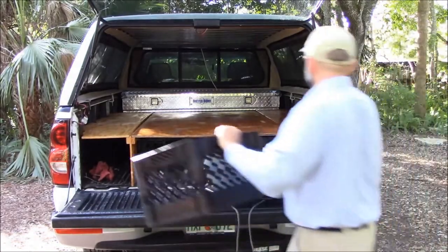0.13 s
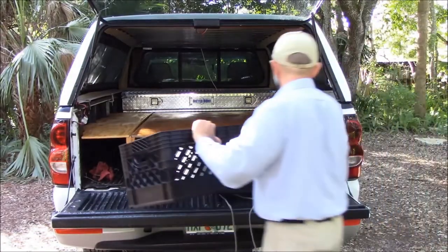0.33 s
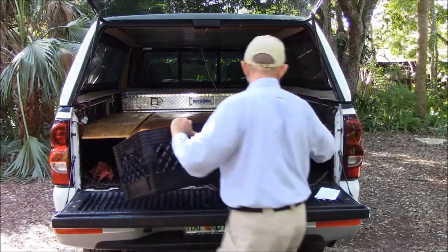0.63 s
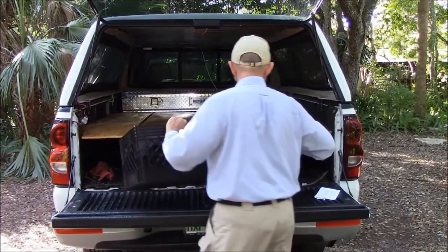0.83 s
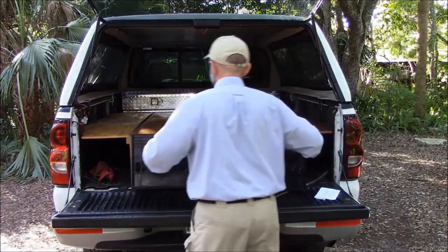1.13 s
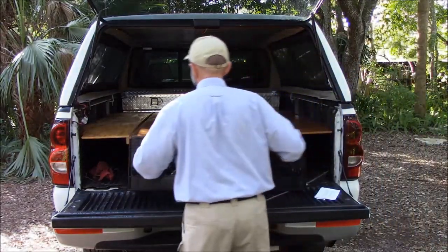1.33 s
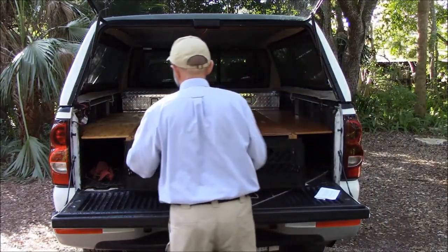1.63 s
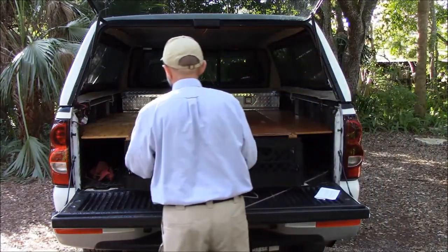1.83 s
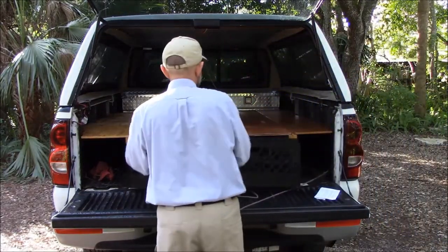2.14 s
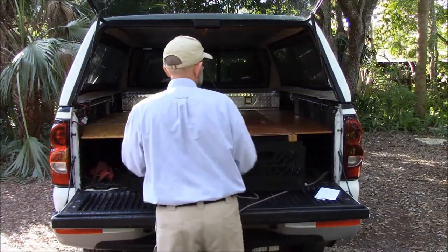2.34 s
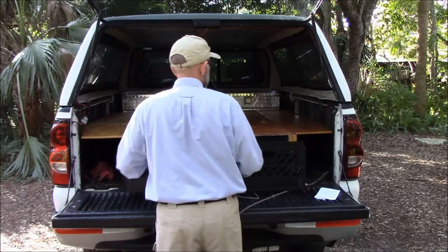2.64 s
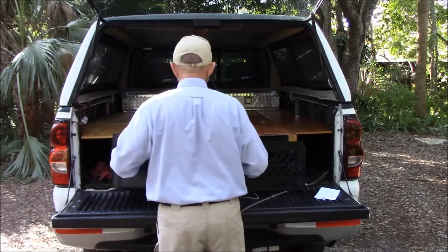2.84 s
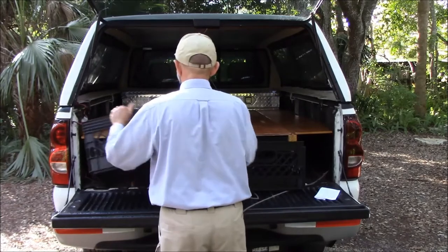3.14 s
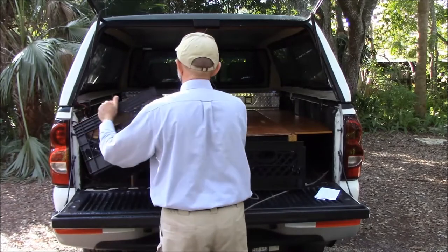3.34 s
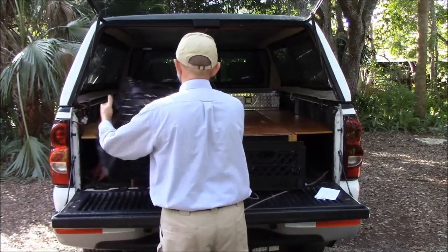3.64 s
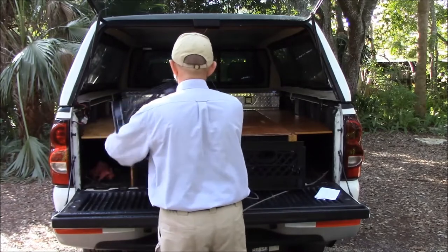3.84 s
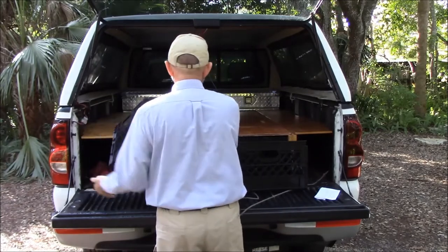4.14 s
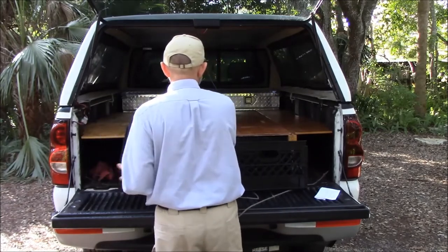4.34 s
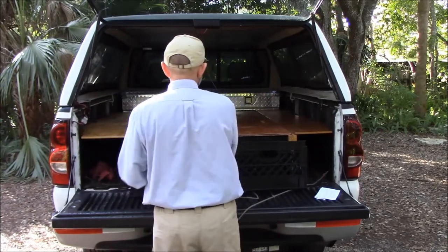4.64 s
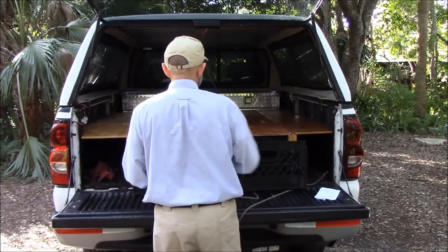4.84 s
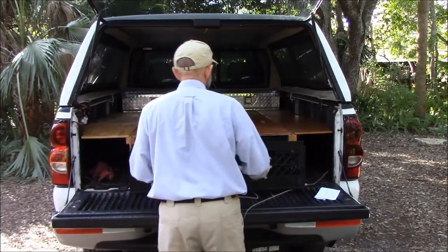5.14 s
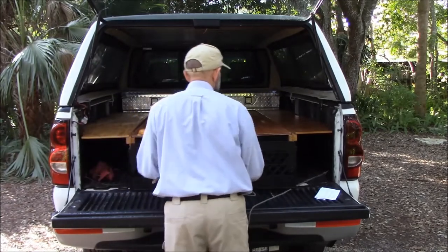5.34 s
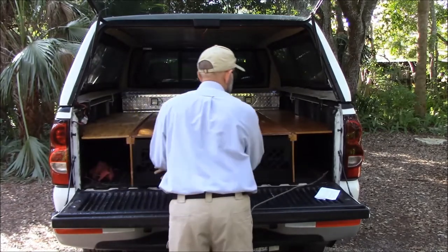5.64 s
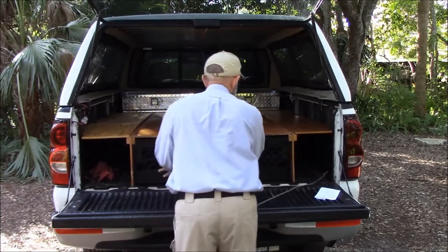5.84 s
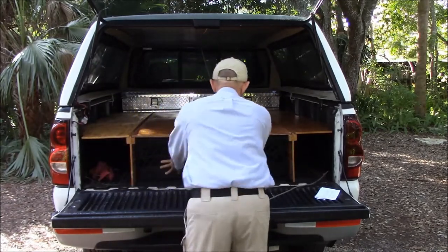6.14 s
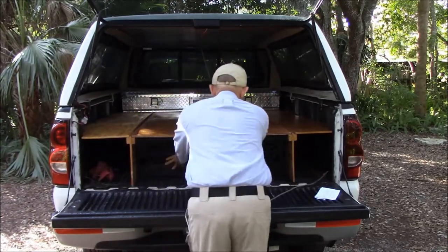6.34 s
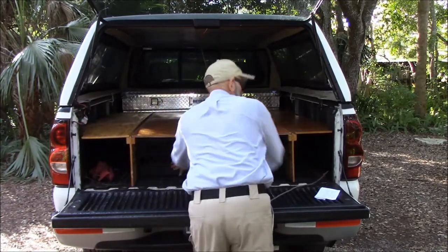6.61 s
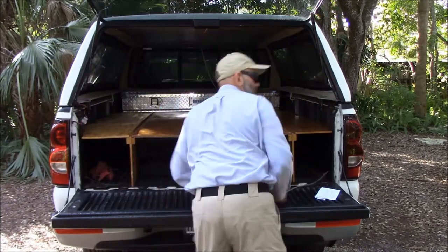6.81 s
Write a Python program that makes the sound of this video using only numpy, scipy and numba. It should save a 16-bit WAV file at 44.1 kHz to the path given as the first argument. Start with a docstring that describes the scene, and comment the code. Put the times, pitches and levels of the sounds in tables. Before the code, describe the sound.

Quiet outdoor air with a soft low rumble. A faint sleeve rustle and tiny dry ticks open, then from 0.25 s an empty plastic crate bumps onto a ribbed truck tailgate: a few moderate hollow knocks until 0.8 s, weaker taps and short gritty scrapes to about 1.45 s, where a duller thump lands. A brief lull follows. From 2.0 to 2.95 s, loud hollow thuds and bright plastic cracks tumble close together with stuttering shoves. Around 3 to 3.9 s there are only small ticks and a cloth brush. At 3.97 s a hard, bright, rapid clatter breaks out, with more knocks and a rough shove at 4.4 to 4.9 s. The strongest bangs hit at 5.2 to 5.3 s, over a long juddering slide under plywood, with further knocks to 5.9 s. The slide fades into light rasp and hiss; a faint wavering high squeak and tiny ticks end it by 6.7 s.

```python
"""A sleeve rustles and small dry ticks sound, then empty plastic crates are knocked about on a tailgate.
Each blow booms in the hollow bed, rings the crate's walls and cracks its ribs, as decaying modes and noise.
Between the blows short shoves scrape by stick-slip; later a long slide runs under a plywood deck.
At the end a corner squeaks, a wavering two-part tone, as the last crate comes to rest.
Quiet outdoor air, shaped noise, lies behind it all, and a limiter flattens the loudest knocks."""
import sys
import numpy as np
from scipy import signal
from scipy.fft import rfft, irfft, next_fast_len
from scipy.io import wavfile
from scipy.ndimage import uniform_filter1d, minimum_filter1d
from numba import njit

SR = 44100
rng = np.random.default_rng(int(sys.argv[2]) if len(sys.argv) > 2 else 0)


def log_audio(samples):
    """Write samples as a 16-bit WAV file to the path given in sys.argv[1]."""
    # one column per channel
    frames = np.atleast_2d(samples).T
    # limit to full scale, then quantise
    limited = np.clip(frames, -1, 1)
    pcm = np.round(limited * 32767).astype(np.int16)
    wavfile.write(sys.argv[1], SR, pcm)


N = 307411

# crate blows: t/s, level/dB, weight on the bed/dB, hardness/dB, rib pitch f/Hz,
# slap level against first contact/dB, extra hardness of the slap/dB
CRATE_BLOWS = [ (.252, -19, -11.5, -11.5, 4660, -0.5, 11.5), (.49, -24.5, -6, -8, 2000, -9, 0),
               (.533, -16, -2.5, 2.5, 1750, 3, 0.5), (.603, -23.5, 7, -12, 2000, -6, 0),
               (.764, -24, 5.5, -1.5, 5500, -1, -10), (0.824, -25.5, -7, 3, 3000, -23, -5),
               (0.902, -34, -1, -6, 2000, -5, -2), (.926, -27.5, -9, -8.5, 2200, -4, -4),
               (1.059, -32, -1, -2.5, 2500, -2, 0), (1.161, -28, 1.5, -1.5, 2260, -5, -11),
               (1.241, -41.5, -6, 14.5, 3970, -15, 0), (1.329, -24, -1.5, 5.5, 3900, -5.5, 3),
               (1.429, -25.5, 6, 1.5, 2700, -4.5, -2), (1.452, -18, 0, -12, 3200, -13, 2),
               (1.81, -36.5, 2, 0.5, 1800, -9, 4), (2.016, -13.5, -2.5, -3.5, 2920, -1, 5.5),
               (2.135, -18.5, -0.5, 1.5, 1870, 5.5, -3), (2.234, -13.5, -3, 7, 4500, -14, 2),
               (2.276, -24, -10, -3, 2520, -7, 7), (2.317, -14.5, -8.5, 0, 2420, -6, 1),
               (2.44, -28, 1, -8, 2000, -21, -2), (2.587, -20.5, 0.5, 4, 4260, 4.5, -6.5),
               (2.691, -19, -1, 3, 3520, 5, 2), (2.733, -19, -11, 2.5, 4970, -6.5, 2),
               (2.811, -31, -14, -5, 4000, -12, 0), (2.939, -22, -6, 7.5, 6750, -12.5, 6.5),
               (3.965, -11, -15, 1, 4000, -9, -2), (3.987, -17.5, -8, 12, 5040, -18, -10),
               (4.022, -13.5, -6.5, 4.5, 4800, -5.5, -7), (4.064, -14.5, -3, 3.5, 4700, -6, -7),
               (4.179, -27, 2, -12, 2500, -11, 0), (4.41, -15.5, -6, -2, 4600, -4.5, 13),
               (4.504, -27.5, 6, 9, 3480, -20, -2), (4.535, -15.5, -7, 7.5, 4800, -3.5, 2),
               (4.613, -20, -0.5, 2, 3400, -6, 5), (4.82, -26, -6, -5, 1960, -12, 0),
               (4.861, -34.5, 5, 0.5, 3830, -8, 1), (5.182, -19.5, 3, 0.5, 2750, -3, -7),
               (5.262, -9, -10, 3, 3670, -12, 6), (5.308, -11.5, -1.5, -2.5, 2800, -12.5, 14),
               (5.553, -15, -3.5, -1.5, 1400, -10, 3), (5.625, -18, -0.5, 0.5, 4800, -13, 0),
               (5.706, -27, 12, 10, 3000, -23, -3), (5.93, -24.5, 5, -3, 1950, -4.5, 0),
               (6.337, -31.5, -13, 10, 5500, -4, -2)]
# short shoves and grazes over the ribbed bed: start t/s, length/s, level/dB, weight on the bed/dB, hardness/dB
SHOVES = [(.37, 0.15, -47, 5, 16.5), (1.164, 0.26, -33, 6.5, -4), (1.41, 0.1, -28, 9, 2.5),
          (1.995, 0.11, -23, 9, 5), (2.137, 0.21, -27, 9, 3), (2.357, 0.23, -36, 10.5, -15),
          (2.552, 0.045, -26.5, 1, 5.5), (2.897, 0.049, -33.5, -7, 12.5), (3.969, .13, -23.5, -10, -8),
          (4.409, 0.19, -18, -2, 4.5), (4.652, .2, -33.5, 7, 4.5)]
# long slide under the deck: t/s, effort level/dB (before SLIDE_DB)
SLIDE = [(5.05, -39.5), (5.192, -19.5), (5.318, -18), (5.376, -22), (5.426, -19.5), (5.466, -30.5),
         (5.564, -17), (5.954, -23), (6.09, -30.5), (6.412, -28), (6.642, -51.5), (6.66, -56)]
# small dry ticks of handling and of grit underfoot: t/s, level/dB, pitch f/Hz
TICKS = [(.048, -53, 4950), (.184, -47, 5770), (.402, -41.5, 2900), (.47, -46, 5000), (.662, -48, 7750),
         (1.086, -43, 1670), (1.129, -38.5, 1900), (1.401, -48, 4250), (2.855, -47, 4100),
         (3.135, -39.5, 2350), (3.353, -46, 5960), (3.482, -44, 1730), (3.581, -48.5, 4040),
         (6.6, -52, 8000), (6.648, -39.5, 1380)]
# squeak of a corner coming to rest: t/s, centre pitch f/Hz, centre level/dB
SQUEAK = [(6.50, 2420, -70), (6.53, 2392, -48), (6.56, 2378, -46), (6.60, 2374, -58), (6.66, 2375, -58),
          (6.72, 2370, -72)]
# soft hiss swells: sleeves, and at 6.4 s the hiss of the slide: middle t/s, length/s, swell level/dB
HISS_SWELLS = [(.01, .1, -55), (.66, 0.18, -50), (1.302, 0.42, -50), (3.746, 0.14, -53),
               (3.905, 0.092, -49.5), (5.526, 0.13, -34.5), (6.414, 0.34, -46)]
# modes of the hollow bed and deck: f/Hz, relative level/dB, t60/s before any added damping
BED_MODES = [(74, -8, 0.084), (94.2, 0, 0.28), (122, -1.5, 0.21), (146, -4, 0.39), (166, -9, 0.36),
             (180.1, 1.5, 0.37), (239.2, 1, 0.28)]
# modes of the crate walls: f/Hz, relative level/dB before the hardness tilt, t60/s before any added damping
WALL_MODES = [(295.2, -0.5, 0.14), (331.8, 4.5, 0.2), (360.7, -2, 0.24), (409, 3.5, 0.17), (478.7, -2, 0.2),
              (545.6, -2, 0.22), (632, -12, 0.36), (714, -4.5, 0.22), (802, -14, 0.24), (919.6, -3, 0.13),
              (1009.5, -4, 0.071), (1140, -11, 0.13), (1290, -7, 0.075), (1393, -10.5, 0.11),
              (1640, -21.5, 0.1)]
# modes of the stiff ribs: f/Hz, relative level/dB, t60/s
RIB_MODES = [(1830, 4, 0.13), (2330, -9, 0.089), (2416, 1, 0.17), (2800, 11, 0.078), (3310, 23, 0.13),
             (3680, 0.5, 0.17), (4130, 7, 0.25), (4970, -3, 0.3), (5200, -2, 0.59), (5750, -13, 0.26),
             (5840, -12, 0.26), (6630, -28, 0.49), (8800, -27, 0.12), (10500, -13, 0.11)]
# crowd of weaker bed modes: f/Hz, relative level/dB
BED_COLOUR = [(25, -24), (50, -4), (100, -2), (190, -0.5), (260, -8.5), (400, -29), (900, -86)]
# crowd of weaker wall modes: f/Hz, relative level/dB before the hardness tilt
WALL_COLOUR = [(120, -31), (240, 1), (360, -5), (600, -1), (1000, -5.5), (1500, -9.5), (2100, -16.5),
               (3200, -23.5), (8000, -48), (16000, -100)]
# crowd of weaker rib modes: f/Hz, relative level/dB
RIB_COLOUR = [(500, -30), (1200, -3), (1900, 2), (2800, -1), (5200, -1), (6400, -4), (8200, -14),
              (10500, -14), (13000, -21), (16000, -35)]
# outdoor air spectrum: f/Hz, relative level/dB
AIR = [(12, -42), (20, -28), (37, -2), (63, 0), (127, -12), (255, -10), (310, -14.5), (399, -11.5),
       (485, -17), (527, -13), (1120, -25), (1530, -33), (3630, -49), (5380, -49.5), (16000, -50.5)]
# soft hiss spectrum: f/Hz, relative level/dB
HISS_COLOUR = [(300, 13), (1200, 7), (3000, 5), (5500, 4), (8200, -6.5),
               (10500, -2), (13000, -14.5), (16000, -16)]

SLAP_LAG_S = 0.016
TYPICAL_RIB_HZ, TOP_DB_PER_OCTAVE = 3430, 4.5  # the top of a crack rises with the pitch of its rib
RIB_DB = -15.5  # ribs against walls
TILT_PER_HARD_DB = 0.41  # dB per octave of wall brightness for each dB of hardness
BOOM_RING, KNOCK_RING, CRACK_RING = 1.05, 1.01, 0.9  # ring lengths of a blow, as factors of decay
SHOVE_ATTACK_S, SHOVE_RELEASE_S, SHOVE_SAG_DB = 0.008, 0.018, 5
SLIDE_DB, SLIDE_WEIGHT_DB = -1, 4.5  # level against effort; weight on the bed
FULL_PUSH_DB, SLIDE_RASP_PER_DB = -19.5, 0.28  # hardness gained for each dB of effort under a full push
HISS_DB = -56.5  # between swells
AIR_DB = -36.5
RING_SIZE, ATTACK_SIZE = 30000, 1100  # samples in a ring, and in the attack that sets its level
NOW = np.arange(N) / SR
AGE = np.arange(RING_SIZE) / SR


def blows():
    """A corner lands first and the rim slaps down just after; each contact drives bed, walls and ribs."""
    out = np.zeros(N)
    for s, db, weight_db, hard_db, rib_hz, slap_db, slap_hard_db in CRATE_BLOWS:
        corner = (s, db, hard_db)
        rim = (s + SLAP_LAG_S, db + slap_db, hard_db + slap_hard_db)
        for at, level_db, hardness in (corner, rim):
            boom_db, knock_db, crack_db = contact(level_db, weight_db, hardness)
            add(out, at, undb(boom_db) * boom(BOOM_RING))
            add(out, at, undb(knock_db) * knock(KNOCK_RING, TILT_PER_HARD_DB * hardness))
            add(out, at, undb(crack_db) * brighten(crack(CRACK_RING, rib_hz), rib_hz))
    return out


def contact(db, weight_db, hard_db):
    """Levels in bed, walls and ribs: weight reaches the bed, hardness the ribs."""
    return db + weight_db, db, db + RIB_DB + hard_db


def boom(length):
    """The heavy bed swells late and rings long."""
    return body(BED_MODES, BED_COLOUR, length, rise=0.025, t60=0.29, tail_db=-6, tail_t60=0.81)


def knock(length, tilt=0):
    """The thin walls give a short hollow note, brighter with more tilt."""
    modes = [(hz, db + wall_gain(hz, tilt), t60) for hz, db, t60 in WALL_MODES]
    points = [(hz, db + wall_gain(hz, tilt)) for hz, db in WALL_COLOUR]
    return body(modes, points, length, rise=0.008, t60=0.15, tail_db=-18, tail_t60=0.55)


def wall_gain(hz, tilt):
    """A harder contact favours the higher wall modes; tilt is in dB per octave."""
    return tilt * np.log2(np.clip(hz, 300, 2000) / 600)


def crack(length, hz):
    """The struck rib snaps near its own pitch in uneven, decaying noise; its neighbours ring on."""
    # the noise steps to a new random level every 90 samples
    uneven = undb(2.5 * np.repeat(rng.standard_normal(RING_SIZE), 90)[:RING_SIZE])
    decay = fade(0.093 * length) + undb(-21.5) * fade(0.53)
    burst = rng.standard_normal(RING_SIZE) * uneven * decay
    snap = colour(np.pad(burst, (0, ATTACK_SIZE)), RIB_COLOUR)[:RING_SIZE]
    neighbours = rng.standard_normal(len(RIB_MODES)) @ mode_shapes(RIB_MODES)
    snap = unit(snap, ATTACK_SIZE) + undb(-16) * unit(neighbours, ATTACK_SIZE)
    rib = signal.lfilter(*signal.iirpeak(hz, 1.6, SR), snap)
    return unit((snap + undb(8) * rib) * (1 - fade(0.0056)), ATTACK_SIZE)


def brighten(snap, hz):
    """A high, stiff rib carries more of the top octave than a low one."""
    top_db = TOP_DB_PER_OCTAVE * np.log2(hz / TYPICAL_RIB_HZ)
    return colour(np.pad(snap, (0, ATTACK_SIZE)), [(6000, 0), (10000, top_db)])[:RING_SIZE]


def body(modes, points, length, rise, t60, tail_db, tail_t60):
    """Answer to one blow: clear modes at random strengths and a dense ring that lingers under the canopy."""
    weights = rng.choice([-1, 1], len(modes)) * undb(3.7 * rng.standard_normal(len(modes)))
    clear = weights @ mode_shapes(modes) * fade(2 * length)  # the extra fade damps every mode
    decay = fade(t60 * length) + undb(tail_db) * fade(tail_t60)
    dense = colour(rng.standard_normal(RING_SIZE), points) * decay
    ring = undb(2) * unit(clear, ATTACK_SIZE) + unit(dense, ATTACK_SIZE)
    return unit(ring * (1 - fade(rise)), ATTACK_SIZE)


def mode_shapes(modes):
    """One decaying sine for each mode."""
    return np.array([undb(db) * np.sin(2 * np.pi * hz * AGE) * fade(t60) for hz, db, t60 in modes])


def drags(count=4):
    """The crate's four corners judder over the bed: coarse catches shake bed and walls, fine grit rasps ribs."""
    forces = shoves() + slide()
    bed, wall, rib = forces * undb(2.3 * walk(75))
    booms = [boom(0.24) for _ in range(count)]
    knocks = [knock(0.51, tilt=0.83) for _ in range(count)]
    cracks = [crack(0.58, hz=1700) for _ in range(count)]
    return (undb(-3.5) * scrape(bed, rate=120, spread_db=13, rings=booms)
            + scrape(wall, rate=240, spread_db=14, rings=knocks)
            + scrape(rib, rate=340, spread_db=17, rings=cracks))


def shoves():
    """Forces of the short shoves: each grips quickly, eases off a little and stops."""
    forces = np.zeros((3, N))
    for s, length, db, weight_db, hard_db in SHOVES:
        grip = np.interp(NOW, [s, s + SHOVE_ATTACK_S], [0, 1])
        sag = undb(-SHOVE_SAG_DB * np.clip((NOW - s) / length, 0, 1))
        stop = np.exp(-np.maximum(NOW - s - length, 0) / SHOVE_RELEASE_S)
        forces += np.outer(undb(contact(db, weight_db, hard_db)), grip * sag * stop)
    return forces


def slide():
    """Forces of the long slide: the bed follows the walls; a lighter push has relatively more rasp."""
    effort_db = curve(SLIDE)[0] + SLIDE_DB
    hard_db = SLIDE_RASP_PER_DB * (FULL_PUSH_DB - effort_db)
    sliding = (NOW > SLIDE[0][0]) * (NOW < SLIDE[-1][0])
    return undb(contact(effort_db, SLIDE_WEIGHT_DB, hard_db)) * sliding


def scrape(force, rate, spread_db, rings):
    """Catches wander among several contact points, each of which rings differently."""
    shares = undb(3.85 * np.array([walk(14) for _ in rings]))
    shares /= np.linalg.norm(shares, axis=0)
    out = np.zeros(N)
    for share, ring in zip(shares, rings):
        kicks = force * share * unit(catches(rate, spread_db))
        out += signal.oaconvolve(kicks, ring / np.linalg.norm(ring))[:N]
    return out


def catches(rate, spread_db):
    """Stick-slip: kicks of uneven size at random moments, on average rate per second."""
    return (rng.random(N) < rate / SR) * rng.choice([-1, 1], N) * undb(spread_db * rng.random(N))


def ticks():
    """Tiny dry snaps: noise bursts, each passed twice through one broad resonance."""
    out = np.zeros(N)
    for s, db, hz in TICKS:
        b, a = signal.iirpeak(hz, 1.4, SR)
        burst = rng.standard_normal(RING_SIZE) * (fade(0.025) + undb(-28) * fade(0.2))
        snap = signal.lfilter(b, a, signal.lfilter(b, a, burst))
        add(out, s, undb(db) * unit(snap, size=220))
    return out


def squeak():
    """A thin wavering note from a sticking corner, with a fainter wall mode above it."""
    hz, db = curve(SQUEAK)
    phase = 2 * np.pi * np.cumsum(hz * (1 + 0.00276 * walk(90))) / SR
    tone = np.sin(phase) + undb(-10) * np.sin(1.416 * phase)
    sounding = (NOW > SQUEAK[0][0]) * (NOW < SQUEAK[-1][0])
    return np.sqrt(2) * tone * undb(db + 2.5 * walk(70)) * sounding


def soft_hiss():
    """Shaped noise, uneven in level, that swells and fades with the sleeves and late in the slide."""
    hiss = colour(rng.standard_normal(N), HISS_COLOUR)
    swells = sum(undb(db) * np.exp(-(2 * (NOW - s) / length) ** 2) for s, length, db in HISS_SWELLS)
    return unit(hiss) * (undb(HISS_DB) + swells) * undb(walk(33))


def air():
    """Distant rumble and leaf hiss: shaped noise, swaying a little."""
    return unit(colour(rng.standard_normal(N), AIR)) * undb(AIR_DB + 0.25 * walk(4.9))


def undb(db):
    """Decibels to gain."""
    return 10 ** (np.asarray(db) / 20)


def unit(x, size=None):
    """Scale to rms 1, judged on the first samples or on all."""
    return x / np.sqrt(np.mean(x[:size] ** 2) + 1e-18)


def curve(rows):
    """Each column of a table joined by straight lines in time."""
    s, *columns = np.transpose(rows)
    return [np.interp(NOW, s, c) for c in columns]


def fade(t60):
    """Exponential decay by 60 dB in t60 seconds."""
    return np.exp(-np.log(1000) * AGE / np.maximum(t60, 0.001))


def add(track, s, sound):
    """Mix a sound into a track at a time in seconds."""
    i = int(s * SR)
    track[i:i + len(sound)] += sound[:N - i]


def colour(x, points):
    """Shape a signal with a spectrum of (f/Hz, level/dB) points."""
    hz, db = np.transpose(points)
    size = next_fast_len(len(x), True)
    f = np.maximum(np.arange(size // 2 + 1) * SR / size, 1)
    gain = undb(np.interp(np.log(f), np.log(hz), db))
    return irfft(rfft(x, size) * gain, size)[:len(x)]


def walk(rate):
    """Slow random wander of spread near 1, with rate new values per second."""
    k = int(SR / rate)
    steps = np.repeat(rng.standard_normal(N // k + 1), k)
    return 1.44 * uniform_filter1d(uniform_filter1d(steps, k), k)[:N]


def scene():
    """All sources summed into one channel."""
    return (blows() + drags() + ticks() + squeak() + soft_hiss() + air())[None]


@njit
def hold_peaks(x, release):
    """Follow each peak at once and let go slowly."""
    out, e = np.empty(len(x)), 0.
    for i in range(len(x)):
        e = max(x[i], e * release)
        out[i] = e
    return out


def limiter(x, ceiling_db, release_s):
    """Turn the gain down just ahead of any peak over the ceiling."""
    peaks = hold_peaks(np.abs(x) + 1e-9, np.exp(-1 / (release_s * SR)))
    gain = np.minimum(1, undb(ceiling_db) / peaks)
    return x * uniform_filter1d(minimum_filter1d(gain, size=65), size=65)


def record(dry):
    """Limit the peaks, dull the highest treble and cut the top steeply."""
    held = limiter(dry[0], ceiling_db=-6.5, release_s=0.07)
    dull = signal.sosfilt(signal.butter(2, 14000, fs=SR, output="sos"), held)
    return signal.sosfilt(signal.ellip(10, 0.1, 80, 15900, fs=SR, output="sos"), dull)[None]


dry = scene()
out = record(dry)
log_audio(out)
```